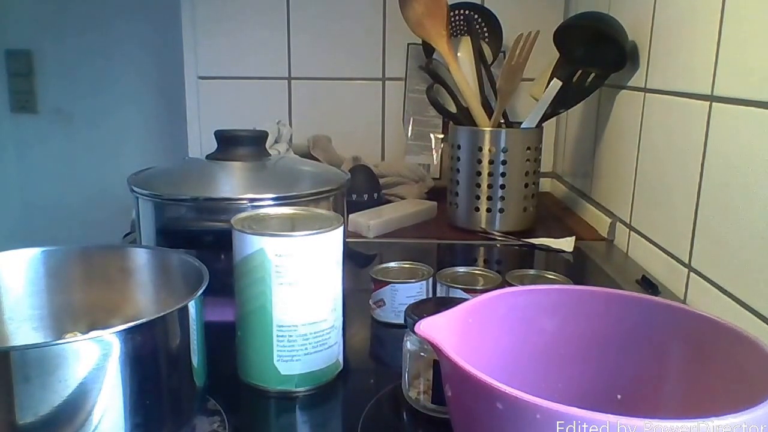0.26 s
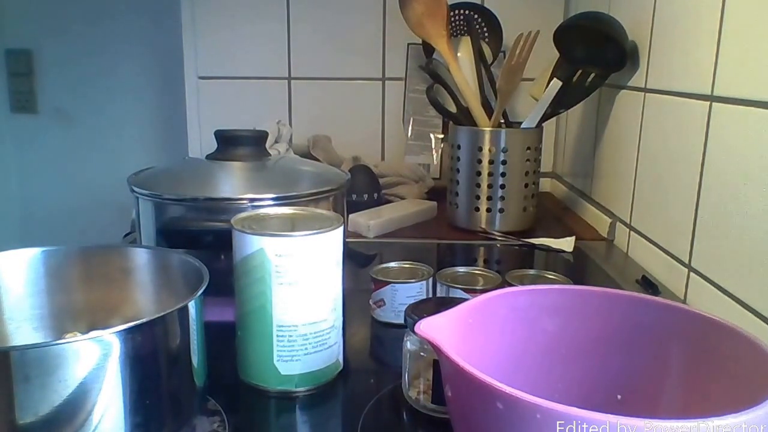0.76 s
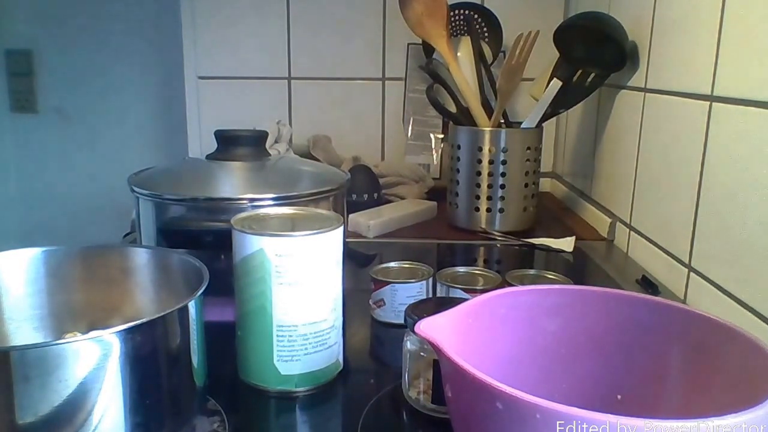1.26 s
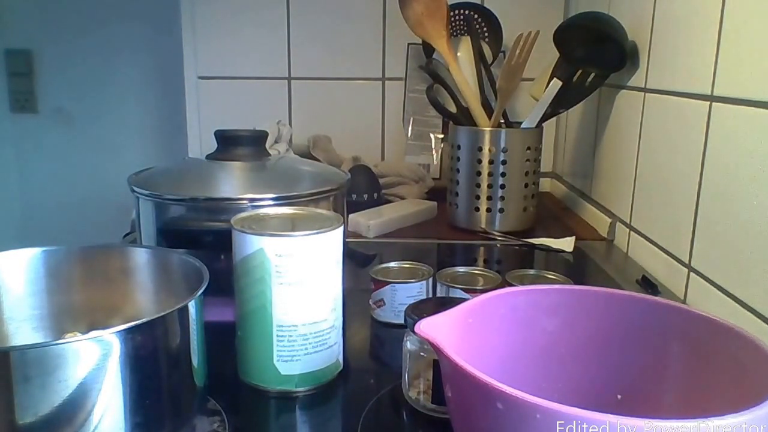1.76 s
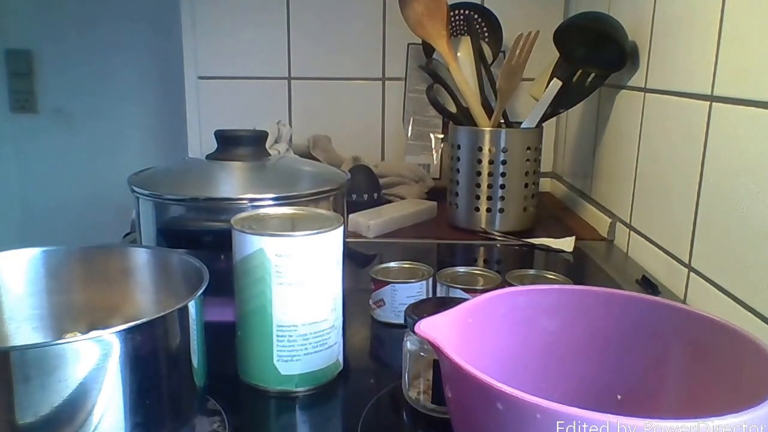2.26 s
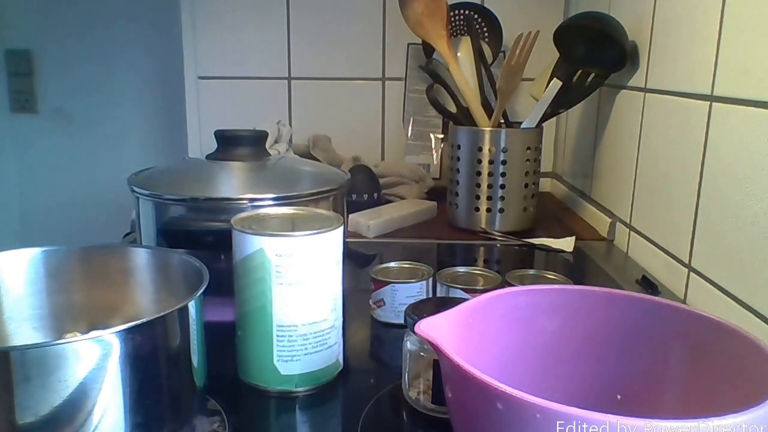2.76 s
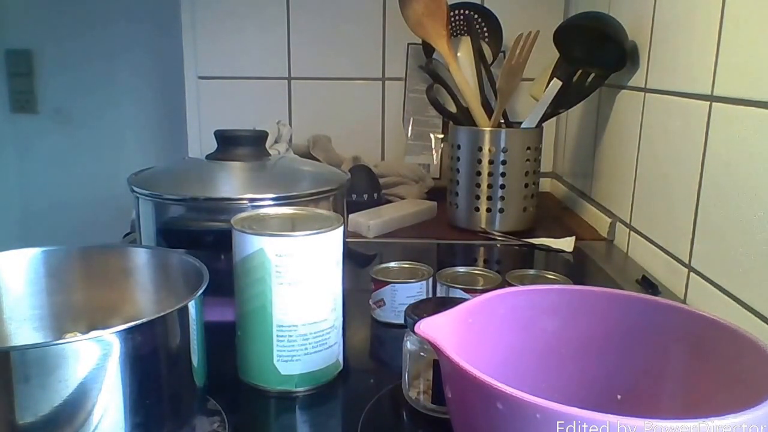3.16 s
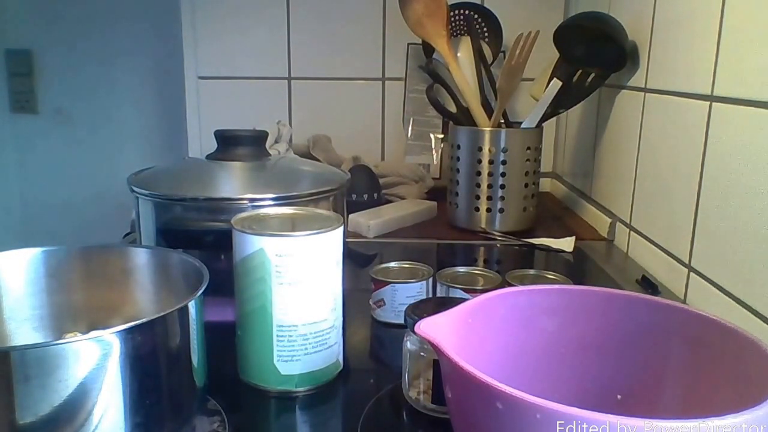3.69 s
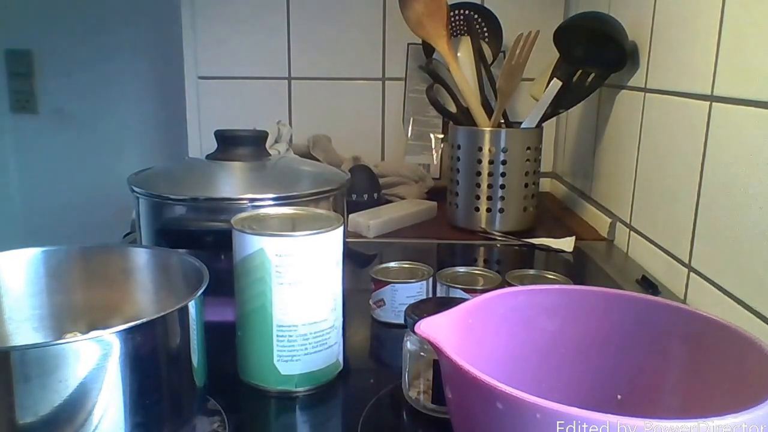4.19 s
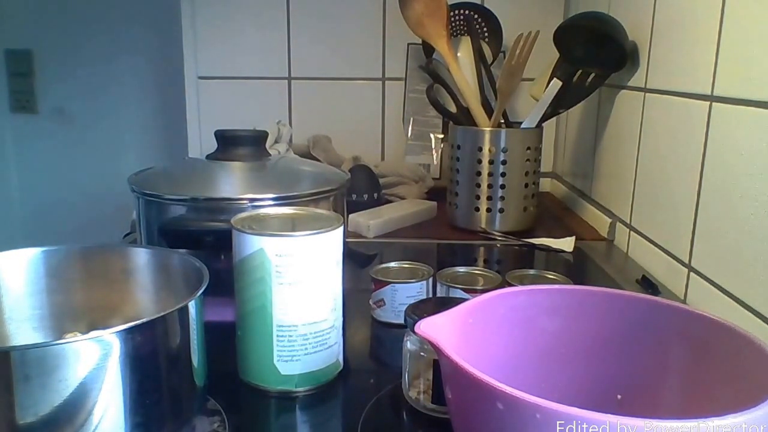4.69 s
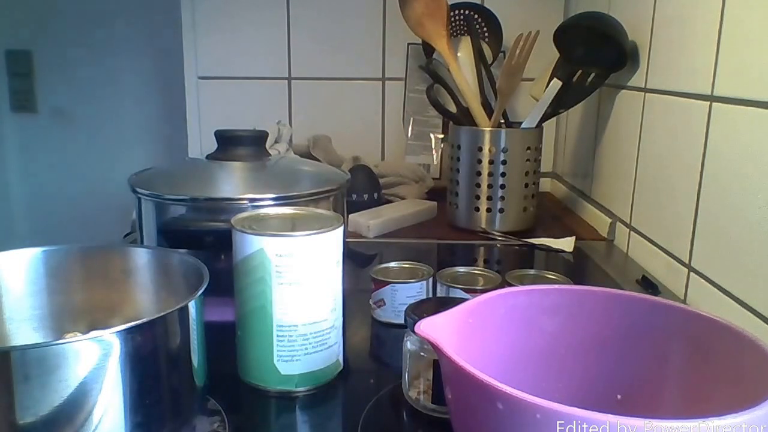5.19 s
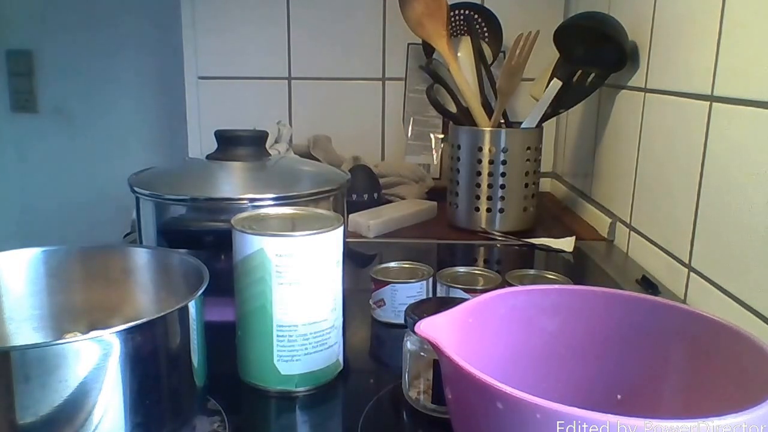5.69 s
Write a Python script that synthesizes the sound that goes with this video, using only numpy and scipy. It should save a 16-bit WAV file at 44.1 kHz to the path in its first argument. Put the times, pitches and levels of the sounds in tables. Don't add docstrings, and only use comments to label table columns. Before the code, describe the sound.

A quiet tiled kitchen with a steady, slightly wavering low fridge hum around 170 Hz and its octave, over dull, muffled room noise. A soft scuff and low heel thump come at 0.2 s. From 0.47 to 0.8 s a metal pot rattles down on the worktop: about ten quick, loud, overlapping knocks, clanky but short and damped, with hollow worktop booms and a brief bright edge, fading off. Lighter nudges follow at 1.12-1.2, 1.37 and 1.5-1.65 s. Then mostly hum, with faint rubbing near 1.9, 2.2 and 2.9 s, a scuff at 3.25 and a heel thump at 3.8 s. A weak pot tick at 4.14 and a small rattle at 4.46-4.72 s mix with gritty scuffs. Shuffling continues to about 5.9 s, with low thumps at 4.85 and 5.35 s. Short tiled echo; a nearby webcam microphone, thin in bass, with rough, patchy, limited treble.

```python
import sys
import numpy as np
from scipy import signal
from scipy.fft import rfft, irfft
from scipy.io import wavfile
from scipy.ndimage import uniform_filter1d

SR = 44100
rng = np.random.default_rng(int(sys.argv[2]) if len(sys.argv) > 2 else 0)


def unload_wav(signal):
    wavfile.write(
        sys.argv[1],
        SR,
        np.round(np.clip(np.atleast_2d(signal).T, -1, 1) * 32767).astype(np.int16),
    )


def invert_db(level):
    return 10 ** (np.asarray(level, dtype=float) / 20)


N = 261954
TIME = np.arange(N) / SR

# [t/s, wall level/dB, rim level/dB, chatter/s]
BLOWS = [(0.472, -17.5, -27, 0.045), (0.505, -19.5, -33.5, 0.014), (0.547, -23.5, -41, 0.019),
         (.592, -17, -42.5, .03), (0.62, -24.5, -42.5, 0.036), (0.654, -20, -32.5, 0.054),
         (.68, -29, -40.5, 0.04), (.708, -21.5, -40, 0.036), (0.741, -34, -47, 0.027),
         (.785, -41, -69, 0.039), (1.12, -28.5, -49, 0.025), (1.151, -32.5, -48.5, 0.028),
         (1.184, -32, -56, 0.017), (1.37, -31.5, -42, 0.04), (1.519, -36.5, -49, 0.044),
         (1.595, -29, -56.5, 0.027), (1.623, -41.5, -54, 0.051), (4.14, -38, -50, 0.029),
         (4.461, -32, -51, 0.084), (4.528, -33.5, -40.5, 0.049), (4.569, -35.5, -63, .05),
         (4.719, -41, -64, 0.025)]
# [f/Hz, level/dB, time to fall 60 dB/s]
WALL_MODES = [(455, -2.5, 0.061), (610, 1, 0.014), (716, 1, 0.034), (800, -5, 0.037), (914, -5, 0.017),
              (990, 2, 0.038), (1083, 1, 0.067), (1169, -3, 0.026), (1310, -11.5, 0.3), (1300, -29, 0.024),
              (1523, -14.5, 0.047), (1659, -6, 0.027), (1783, -11.5, 0.041), (2090, -13.5, 0.06),
              (2110, -20, 0.18), (2740, -28, 0.058)]
# [f/Hz, level/dB, time to fall 60 dB/s]
RIM_MODES = [(3670, 0.5, 0.045), (4500, -14, 0.011), (4730, -0.5, .03), (4926, -5, 0.044),
             (5100, -0.5, .02), (5990, 0, 0.022), (6570, -12, .02), (6440, -6, 0.03), (6950, 7, 0.0099)]
# [t/s, f/Hz, peak level/dB, contact/s]
WORKTOP_BOOMS = [(.27, 524, -40.5, 0.043), (.49, 147.4, -23.5, .03), (1.62, 459, -27.5, 0.036),
                 (.475, 373, -8.5, 0.023), (.477, 455, -18.5, .037), (.506, 324, -11.5, 0.022),
                 (.594, 223, -13.5, .025), (.62, 336.5, -13.5, 0.016), (.645, 204.7, -16.5, 0.036),
                 (.708, 146, -22.5, 0.046), (.74, 279, -27.5, .035), (1.122, 207.4, -18.5, 0.081),
                 (1.152, 234.4, -13, 0.016), (1.179, 488, -23.5, 0.012), (1.187, 246, -25.5, 0.027),
                 (1.378, 475, -20.5, .015), (1.417, 466, -25.5, 0.028), (1.52, 202, -24, 0.015),
                 (1.596, 284, -25, 0.034), (1.627, 253.4, -17.5, 0.016), (4.141, 474, -29.5, 0.041),
                 (4.598, 229, -24, 0.0098), (4.72, 484, -32, 0.036), (5.183, 198, -29, 0.031)]
# [t/s, f/Hz, peak level/dB, contact/s]
WALL_CLANGS = [(.476, 774, -13, 0.024), (.478, 1596, -24.5, 0.025), (.504, 1012, -12, 0.03),
               (.552, 987, -20.5, .045), (.594, 1310, -31, 0.05), (.6, 806, -18, 0.055),
               (.647, 1620, -23, 0.019), (.653, 963, -12, 0.015), (.656, 1315, -19, 0.019),
               (.665, 2277, -28.5, 0.037), (.7, 1056, -19, 0.039), (.705, 1310, -18, 0.042),
               (.74, 1103, -21, 0.02), (.769, 1320, -28.5, 0.052), (.782, 944, -29, 0.017),
               (.785, 1544, -38.5, 0.12), (1.118, 1026, -28.5, 0.016), (1.184, 1066, -42.5, 0.054),
               (1.372, 2270, -41.5, .02), (1.37, 3160, -35, 0.016), (.478, 4810, -37, 0.053),
               (1.6, 1070, -38, 0.024), (1.6, 1950, -39, 0.055), (1.615, 678, -26.5, 0.011),
               (4.47, 656, -35, 0.063), (4.53, 3600, -32.5, 0.013), (4.53, 4850, -31.5, .019),
               (4.535, 1323, -27, 0.019), (4.54, 800, -29, 0.041), (4.56, 555, -31, 0.018)]
WORKTOP_T60_S, WALL_T60_S = 0.11, 0.06

# [t/s, hiss level/dB, rub level/dB, slide/s]
SCUFFS = [(.207, -48.5, -39.5, .024), (1.552, -76, -50, .04), (1.941, -73.5, -54.5, 0.027),
          (2.2, -65, -48, .06), (2.901, -66.5, -57, 0.018), (3.251, -46, -40.5, 0.016),
          (3.777, -63.5, -51, 0.11), (4.335, -56, -47, 0.062), (4.37, -47, -41, 0.049),
          (4.437, -51.5, -39.5, 0.018), (4.528, -39.5, -35.5, 0.0056), (4.834, -50.5, -44, 0.024),
          (4.89, -56.5, -41, 0.026), (4.99, -51.5, -47.5, 0.035), (5.148, -59.5, -47, .018),
          (5.257, -47.5, -44.5, 0.033), (5.367, -57.5, -43, 0.068), (5.524, -60, -41, 0.022),
          (5.825, -57, -44, 0.048), (5.862, -54.5, -44, 0.016)]
# [t/s, peak level/dB, f/Hz]
HEEL_THUMPS = [
    (.235, -22.5, 78.6),
    (0.711, -31.5, 98),
    (3.788, -25, 79.3),
    (3.871, -49.5, 88),
    (4.319, -63, 68),
    (4.847, -30, 83.4),
    (5.329, -35, 188),
    (5.372, -30, 80.5),
]
SCUFF_RISE_S, SCUFF_HZ = 0.01, 5450

# [t/s, base tone level/dB, octave level/dB]
COMPRESSOR_HUM = [(0, -42.5, -37), (.25, -42.5, -60.5), (.45, -40.5, -33), (1.3, -40.5, -42),
                  (1.75, -46, -37.5), (2.0, -44, -34.5), (2.25, -39.5, -41.5), (2.5, -41, -38),
                  (2.85, -37, -40.5), (3.15, -40, -35.5), (3.4, -40, -37), (3.65, -42, -44.5),
                  (3.9, -37, -36.5), (4.3, -37, -40.5), (4.469, -43.5, -36.5), (4.7, -40, -42.5),
                  (5.25, -39, -37), (5.94, -36, -40)]
COMPRESSOR_HZ = 171.93
# [f/Hz, level/dB]
MAINS_HUM = [(100, -57), (150, -45.5), (300.5, -51.5)]

# [f/Hz, level/dB per Hz]
NOISE_COLOUR = [(40, -41), (70, -38), (110, -10), (170, 1.5), (260, -8.5), (400, -5), (520, -8.5),
                (800, -7.5), (1200, -13), (2000, -21.5), (2500, -28.5), (3100, -32), (4500, -36),
                (7600, -39)]
# [t/s, level/dB]
NOISE_LEVEL = [(0, -41.5), (1.001, -42), (1.999, -41), (2.999, -41), (4, -41.5), (5.001, -41), (5.94, -40)]
# [f/Hz, width/Hz, level/dB]
ROOM_TONES = [(127.2, 4.6, -52), (190.6, 8.5, -49), (234.9, 5.1, -50), (345.4, 14, -46), (458, 3.6, -55),
              (701, 23, -62)]
KITCHEN_T60_S, KITCHEN_DB = 0.51, -2

# [f/Hz, width/Hz, share removed 0-1]
MIC_DIP = (3200, 200, 0.38)
THINNED = [.045, .343, .793, 1.282, 1.474, 1.752, 1.935, 2.02, 2.169, 2.39, 2.439, 2.57, 2.62, 2.735, 2.895,
           3.022, 3.18, 3.535, 3.632, 3.697, 4.345, 4.813, 4.968, 5.165, 5.474, 5.711]
EMPTIED = [.466, .962, 1.646, 1.805, 3.487, 3.56]
THINNED_ABOVE_HZ, THINNED_KEEP, EMPTIED_KEEP, THINNED_LOSS = 2800, 0.3, 0.1, 0.95
WEBCAM_TOP_HZ, WEBCAM_RATE_HZ = 7480, 16000


def rms_one(x):
    return x / np.sqrt(np.mean(x ** 2) + 1e-20)


def band(x, low_hz, high_hz):
    return signal.sosfilt(signal.butter(2, [low_hz, min(high_hz, .45 * SR)], "band", fs=SR, output="sos"), x)


def drift(rate):
    r = np.exp(-80 * np.pi * rate / SR)
    noise = rng.standard_normal(N // 40 + 2002)
    slow = signal.lfilter([1], [1, -2 * r, r * r], noise)[2000:]
    return np.interp(np.arange(N) / 40, np.arange(len(slow)), rms_one(slow))


def ring(force, hz, t60):
    r, w = invert_db(-60 / (t60 * SR)), 2 * np.pi * hz / SR
    return signal.lfilter([0, np.sin(w)], [1, -2 * r * np.cos(w), r * r], force)


def add(out, s, sound):
    i = round(s * SR)
    out[i:i + len(sound)] += sound[:N - i]


def pot_clatter():
    out, t = np.zeros(N), TIME[:SR // 3]
    for s, wall_db, rim_db, chatter_s in BLOWS:
        contact = np.clip(t / .006, 0, 1) * np.clip(2.5 * (1 - t / chatter_s), 0, 1)
        force = contact * rng.standard_normal((4, len(t))) + 1e-18
        wall = 7.0 * band(force[3], 480, 1900)
        for k, (hz, db, t60) in enumerate(WALL_MODES):
            wall += invert_db(db) * ring(force[k % 3], hz, min(t60, .2))
        rim = 16.0 * band(force[0], 2500, 7800)
        for k, (hz, db, t60) in enumerate(RIM_MODES):
            rim += invert_db(db) * ring(force[3 - k % 2], hz, min(t60, .024))
        wall = invert_db(wall_db - 29.5) * band(wall, 350, 2700)
        rim = invert_db(rim_db - 38.0) * band(rim, 2400, 8200)
        add(out, s, wall + rim)
    return out


def booms_and_clangs():
    out, t = np.zeros(N), TIME[:SR // 2]
    for rows, t60 in (WORKTOP_BOOMS, WORKTOP_T60_S), (WALL_CLANGS, WALL_T60_S):
        for s, hz, peak_db, contact_s in rows:
            roughness = min(.2 + hz / 4000, .9)
            uneven = 1 + roughness * rms_one(ring(rng.standard_normal(len(t)), 55, .03))
            pressure = np.sin(np.pi * np.clip(t / contact_s, 0, 1)) ** .4
            push = pressure * np.sin(2 * np.pi * (hz * t + rng.random()))
            rung = ring(uneven * push + 1e-18, hz, t60)
            add(out, s, invert_db(peak_db - 4.5) * rung / np.max(np.abs(rung)))
    return out


def shoes():
    out, t = np.zeros(N), TIME[:SR // 3]
    for s, hiss_db, rub_db, slide_s in SCUFFS:
        rise = np.clip(t / SCUFF_RISE_S, 0, 1)
        fade = np.exp(-np.maximum(t - SCUFF_RISE_S - slide_s, 0) / .009)
        grit = rng.standard_normal((2, len(t))) * invert_db(2.6 * rng.standard_normal((2, len(t))))
        hiss = rms_one(band(grit[0], SCUFF_HZ / 1.3, SCUFF_HZ * 1.4))
        rub = rms_one(band(grit[1], 420, 2000))
        add(out, s, rise * fade * (invert_db(hiss_db) * hiss + invert_db(rub_db) * rub))
    for s, peak_db, hz in HEEL_THUMPS:
        swell = (t / 0.012) * np.exp(-t / 0.012)
        add(out, s, invert_db(peak_db - 2.0) * swell * np.sin(2 * np.pi * hz * t))
    return out


def fridge():
    s, first_db, second_db = np.transpose(COMPRESSOR_HUM)
    phase = 2 * np.pi * COMPRESSOR_HZ * TIME + 0.033 * drift(17.0)
    out = invert_db(np.interp(TIME, s, first_db) + 2.6 * drift(5.0)) * np.sin(phase)
    octave_phase = 2 * phase + 0.85 + 0.46 * drift(7.8)
    out += invert_db(np.interp(TIME, s, second_db) + 1.2 * drift(15.0)) * np.sin(octave_phase)
    for hz, line_db in MAINS_HUM:
        out += invert_db(line_db + 2.0 * drift(3.7)) * np.sin(2 * np.pi * hz * TIME + 0.082 * drift(5.5))
    return np.sqrt(2) * out


def room_noise():
    hz, level_db = np.transpose(NOISE_COLOUR)
    edges, white = 40 * 2 ** (np.arange(24) / 3), rng.standard_normal((2, N))
    out, together = np.zeros(N), drift(20.0)
    for k, (low, high) in enumerate(zip(edges, edges[1:])):
        colour_db = np.interp(np.log(low * high) / 2, np.log(hz), level_db)
        gain_db = colour_db + 1.0 * together + 0.56 * drift(13.0)
        out += invert_db(gain_db) * band(white[k % 2], low, high)
    s, room_db = np.transpose(NOISE_LEVEL)
    out = invert_db(np.interp(TIME, s, room_db) + 2.0) * rms_one(out)
    for mode_hz, width_hz, mode_db in ROOM_TONES:
        hum = ring(rng.standard_normal(N), mode_hz, 3.2 / width_hz)
        out += invert_db(mode_db) * rms_one(hum)
    return out


def kitchen_echo(x):
    t = TIME[:SR * 2 // 3]
    tail = rng.standard_normal(len(t)) * invert_db(-60 * t / KITCHEN_T60_S) * np.clip(t / .006, 0, 1)
    return signal.fftconvolve(x, tail / np.sqrt(np.sum(tail ** 2)))[:N]


def scene():
    rattle, rings, steps = pot_clatter(), booms_and_clangs(), shoes()
    to_walls = invert_db(-1) * rattle + steps + invert_db(-14) * rings
    echo = invert_db(KITCHEN_DB) * kitchen_echo(to_walls)
    return (rattle + rings + steps + fridge() + room_noise() + echo)[None]


def coarsen(x, step):
    size = 2 * round(.026 * SR)
    hz, _, lines = signal.stft(x, SR, window="cosine", nperseg=size)
    local = uniform_filter1d(np.abs(lines), size=25, axis=0)
    grid = step * np.clip(hz[:, None] / 1500, .05, 1) * local + 1e-12
    lines = grid * (np.round(lines.real / grid) + 1j * np.round(lines.imag / grid))
    return signal.istft(lines, window="cosine", nperseg=size)[1][:N]


def thin_treble(x):
    out, size = x.copy(), round(.04 * SR)
    window, hz = np.sqrt(signal.windows.tukey(size, .9)), np.fft.rfftfreq(size, 1 / SR)
    for times, kept in (THINNED, THINNED_KEEP), (EMPTIED, EMPTIED_KEEP):
        for s in times:
            i = round(s * SR) - size // 2
            lines = rfft(x[i:i + size] * window)
            strength = uniform_filter1d(np.abs(lines), size=7) * hz
            high = (hz > THINNED_ABOVE_HZ * rng.uniform(.87, 1.13)) & (hz < 6250)
            weak = high & (strength < np.quantile(strength[high], 1 - kept))
            out[i:i + size] -= THINNED_LOSS * irfft(lines * weak, size) * window
    return out


def roll_off(x):
    return signal.sosfilt(signal.butter(12, 15720, fs=SR, output="sos"), x)


def record(dry):
    x = signal.sosfilt(signal.butter(4, 72, "high", fs=SR, output="sos"), dry[0])
    dip_hz, width_hz, share = MIC_DIP
    x = x - share * signal.lfilter(*signal.iirpeak(dip_hz, dip_hz / width_hz, SR), x)
    x = thin_treble(coarsen(x, step=1.2))
    x = signal.sosfilt(signal.ellip(10, .5, 60, WEBCAM_TOP_HZ, fs=SR, output="sos"), x)
    mirrored = x * np.cos(2 * np.pi * WEBCAM_RATE_HZ * TIME)
    image = signal.sosfilt(signal.butter(8, 9000, "high", fs=SR, output="sos"), mirrored)
    mix = x + invert_db(-65.0) * image + invert_db(-90.0) * rng.standard_normal(N)
    return roll_off(mix[None])


dry = scene()
out = record(dry)
unload_wav(out)
```